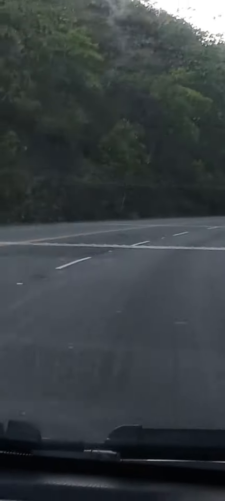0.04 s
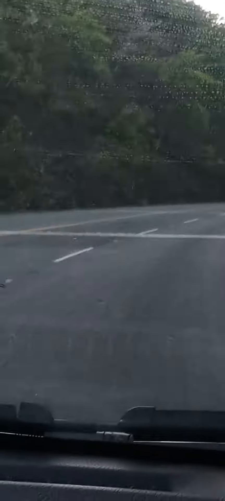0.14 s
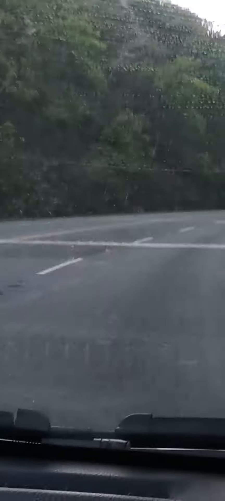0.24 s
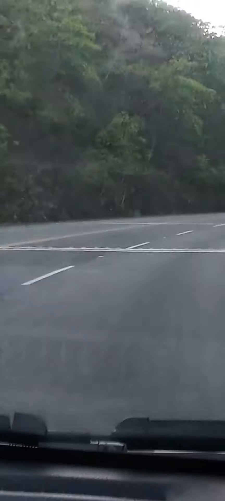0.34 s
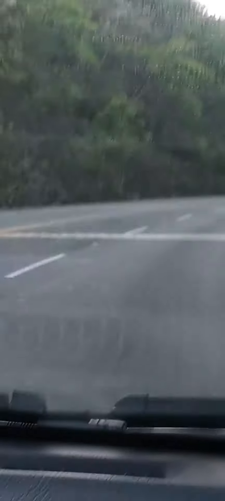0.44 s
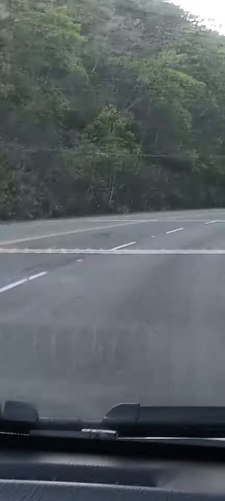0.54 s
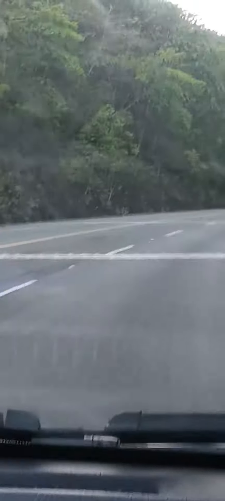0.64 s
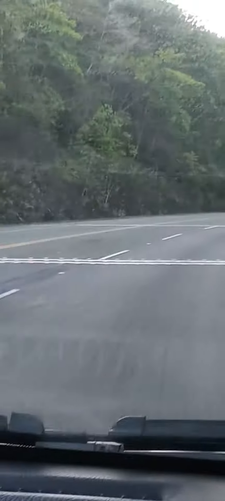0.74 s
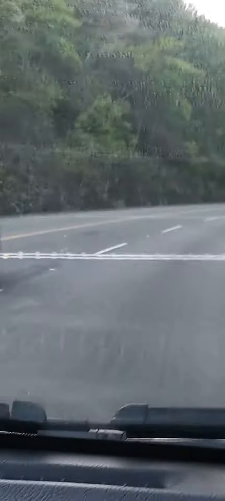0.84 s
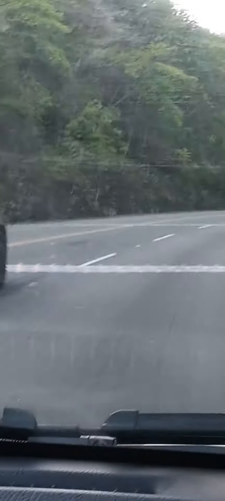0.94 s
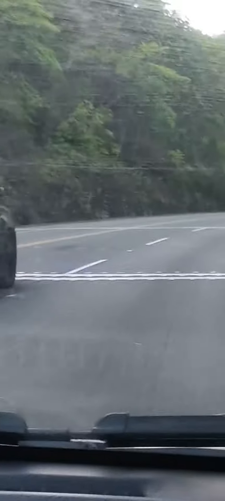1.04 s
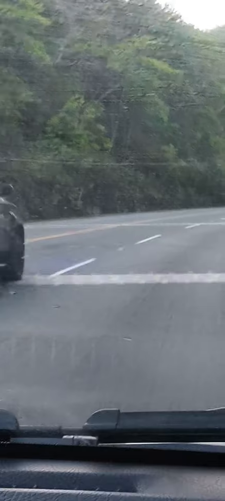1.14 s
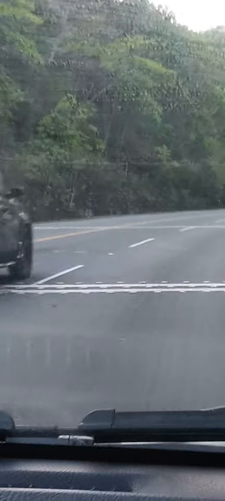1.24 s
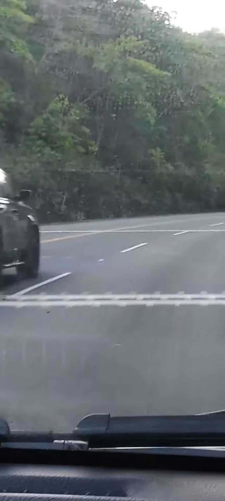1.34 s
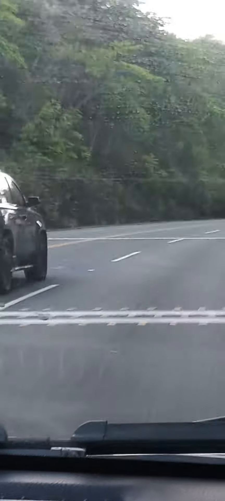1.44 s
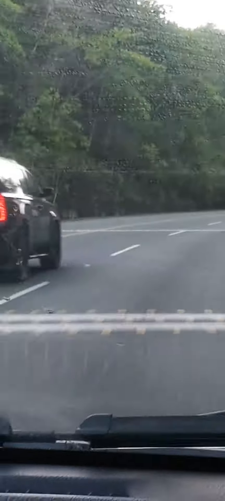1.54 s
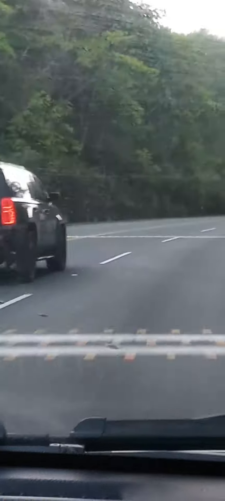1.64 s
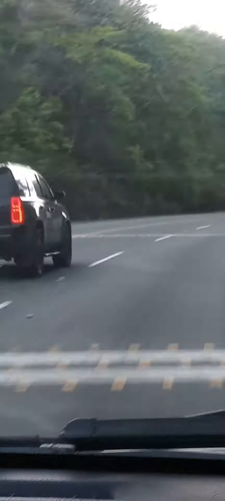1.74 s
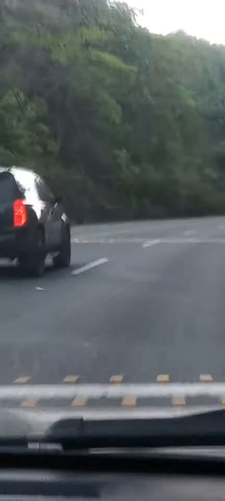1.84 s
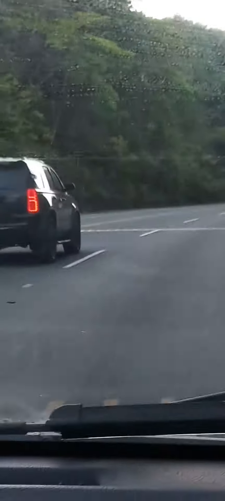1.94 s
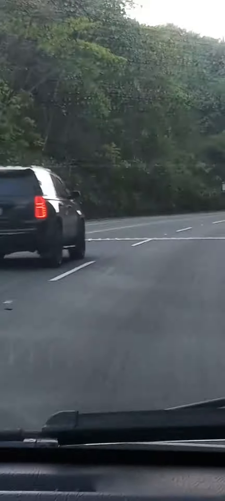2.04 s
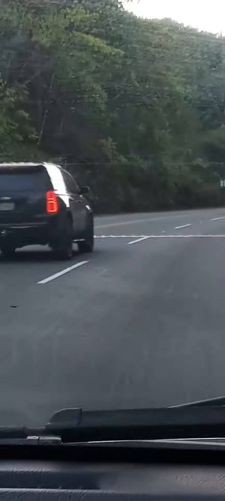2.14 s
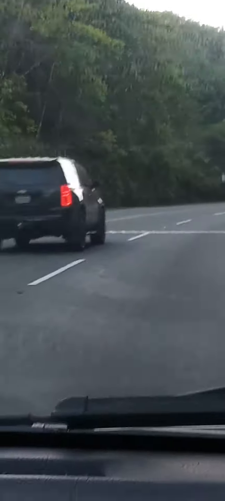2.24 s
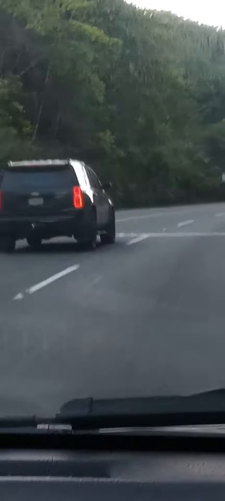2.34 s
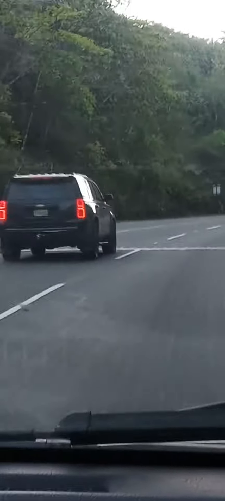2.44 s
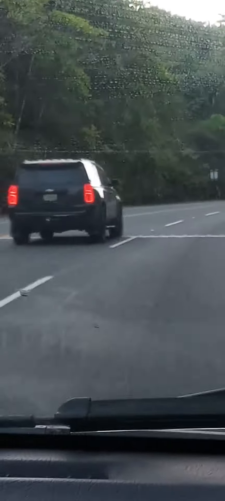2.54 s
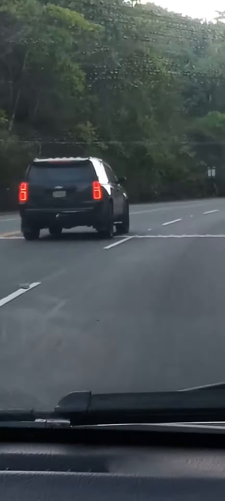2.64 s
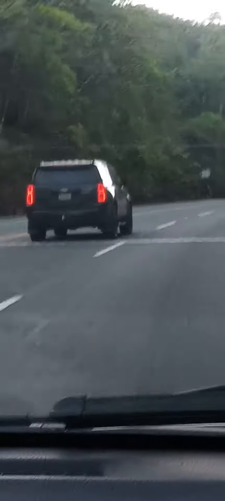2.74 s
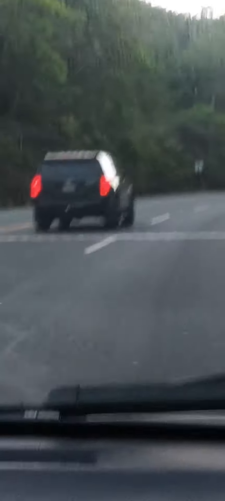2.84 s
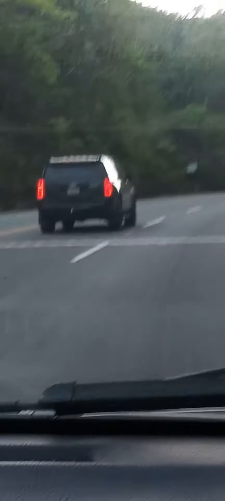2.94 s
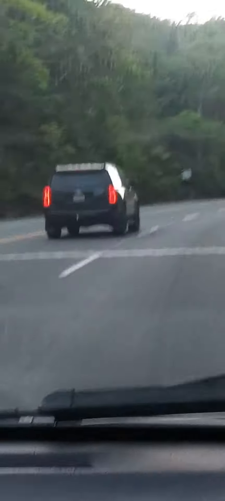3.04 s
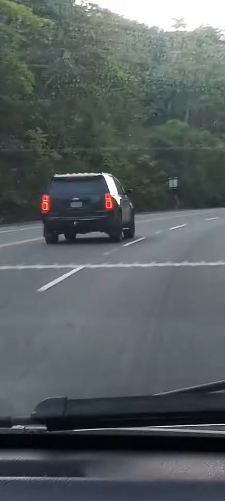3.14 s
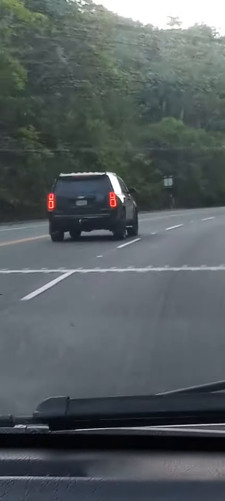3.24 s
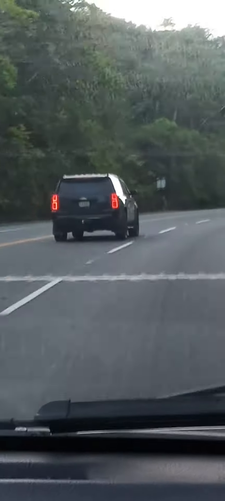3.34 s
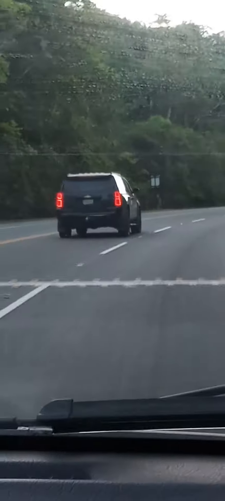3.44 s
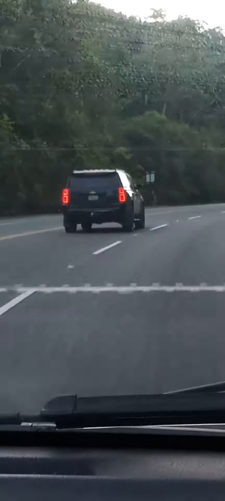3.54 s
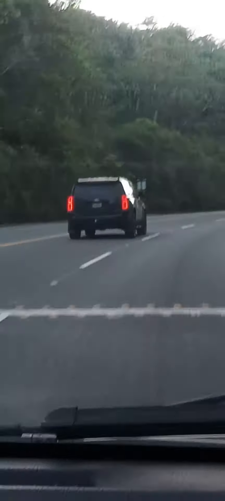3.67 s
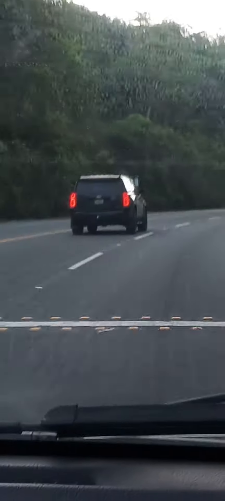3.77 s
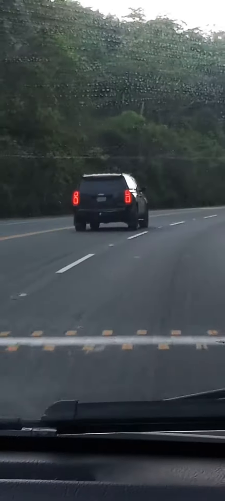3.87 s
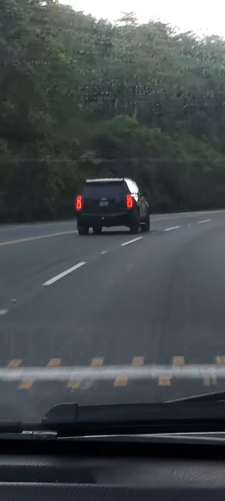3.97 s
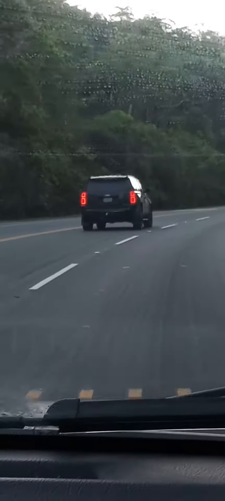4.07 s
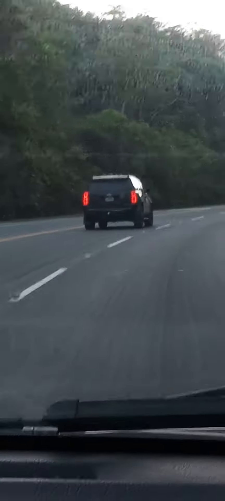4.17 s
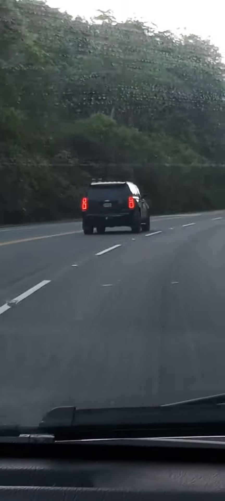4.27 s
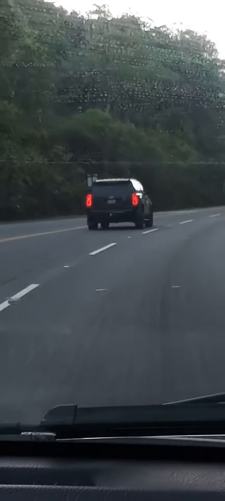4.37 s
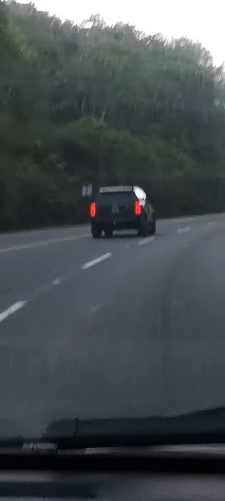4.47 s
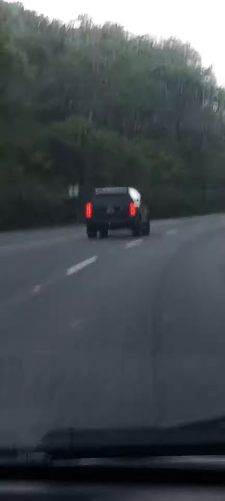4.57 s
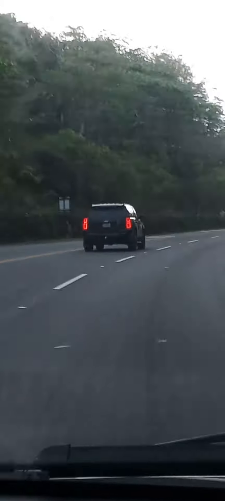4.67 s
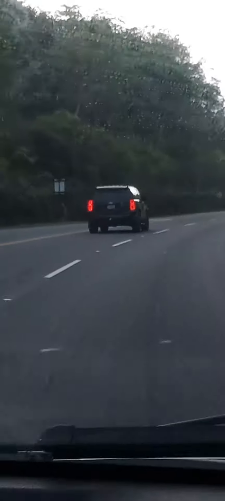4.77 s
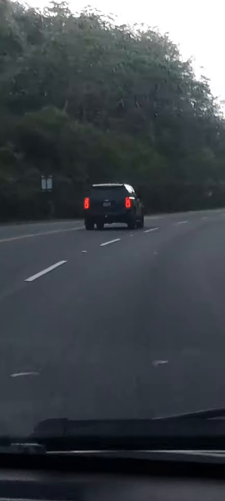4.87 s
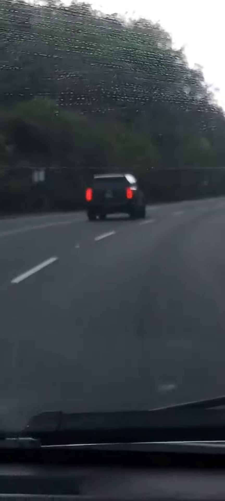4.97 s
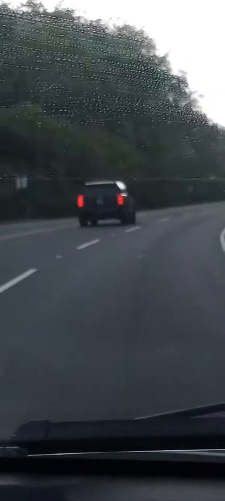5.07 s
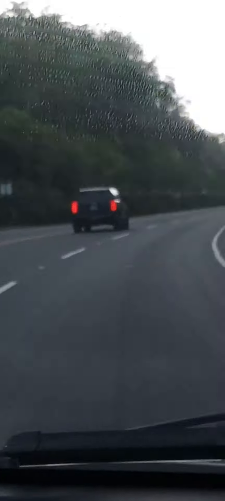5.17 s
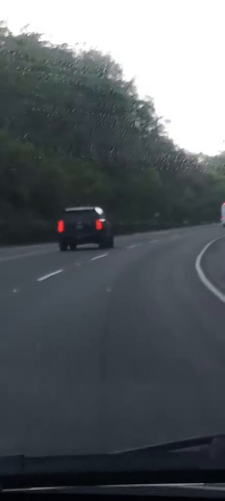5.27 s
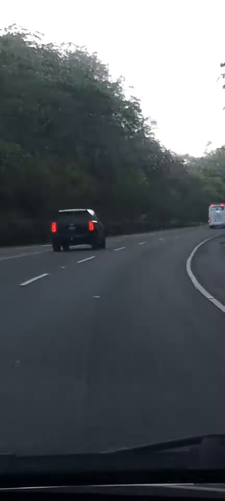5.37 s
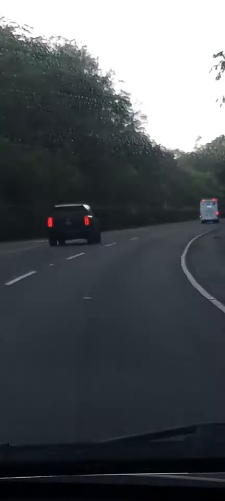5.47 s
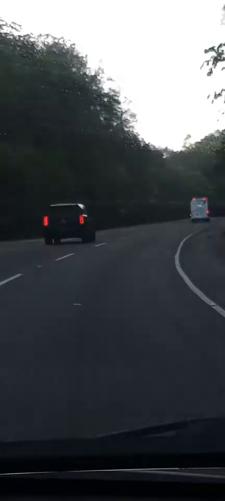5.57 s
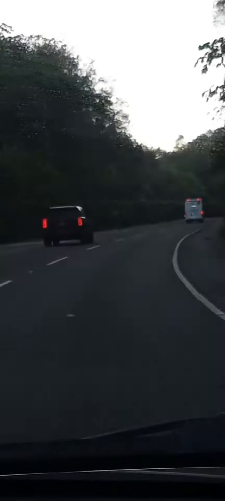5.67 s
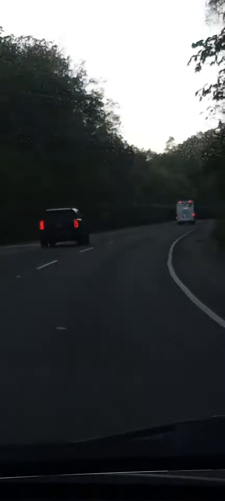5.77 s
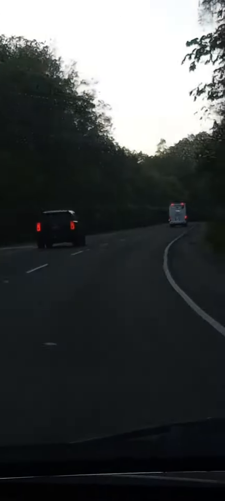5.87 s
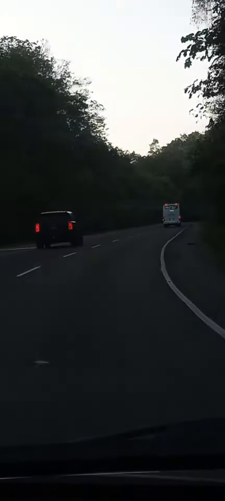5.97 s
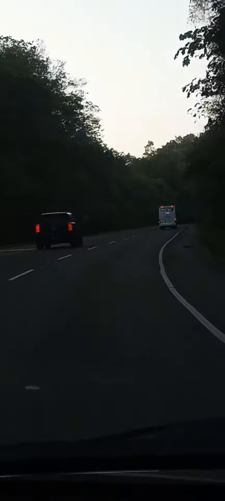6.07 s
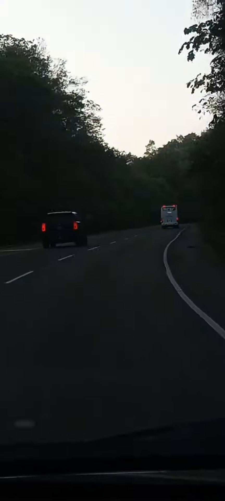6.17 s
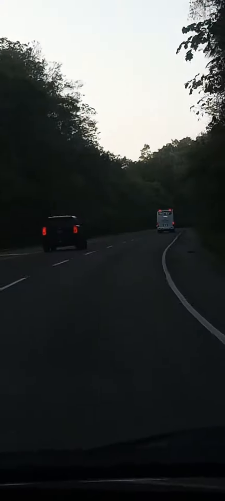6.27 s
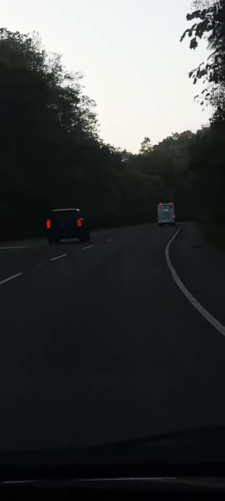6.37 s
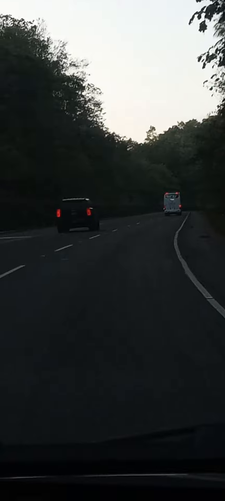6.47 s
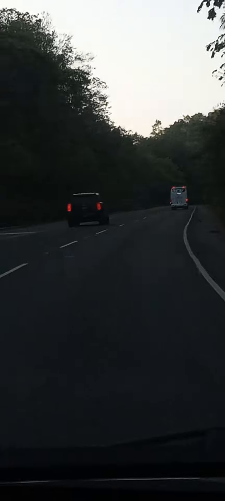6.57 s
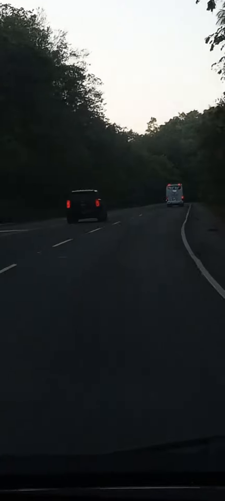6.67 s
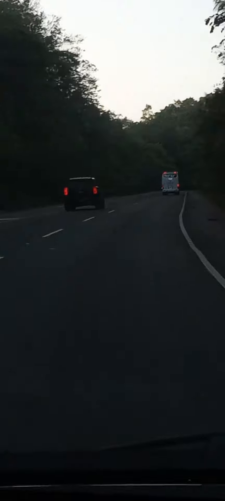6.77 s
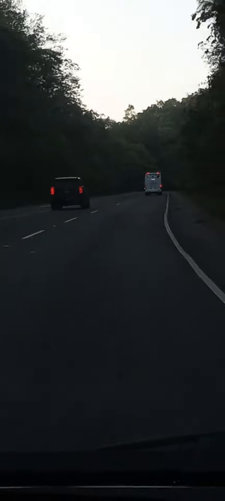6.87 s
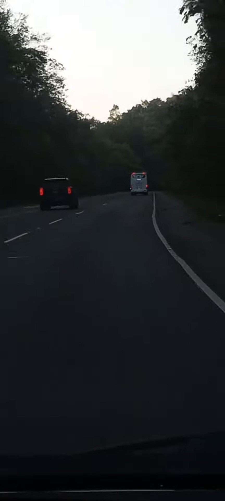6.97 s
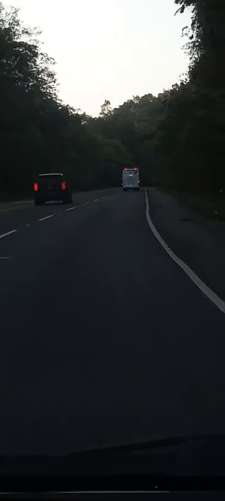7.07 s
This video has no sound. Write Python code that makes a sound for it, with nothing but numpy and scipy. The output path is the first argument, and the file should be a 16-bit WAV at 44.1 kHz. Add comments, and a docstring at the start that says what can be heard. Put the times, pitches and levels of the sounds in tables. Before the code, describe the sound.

Inside a car at highway speed, picked up by a microphone near the dashboard. Almost at once, from 0.07 to about 0.45 seconds, front then rear tyres cross a rumble strip: two joined bursts of very rapid rib blows, about forty a second, booming deep in the cabin, with buzzing trim, plastic clacks, dull suspension knocks and bright loose-metal jingling. A soft rebound and a few tiny ticks follow, over a low asphalt drone with small bumps near 1.1 and 1.5. At 2.24 to 2.6 the second double burst hits just as hard, ending in a low body bounce near 2.7. Quiet drone continues, with light bumps near 3.9 and 4.26. At 4.47 comes a very short burst, then a duller, heavier thump at 4.66 to 4.75. A rebound at 4.9 settles into steady muffled road hum, gentle bumps, soft rush and faint thin whine until 7.1.

```python
"""Rumble strips from inside a car

Three sets of raised ribs pass under the front, then the rear tyres of a car on a highway. Rib blows and noise
ring the body, cabin air and panels into a boom; shaped noise makes the trim buzz, rattle and knock.
A loose metal piece jingles as decaying sine modes, and small trim parts ring as clusters of close ones.
Behind them coloured noise gives asphalt drone with swells at bumps, rush and faint microphone hiss, with a
thin wavering whine. The recorder's gain control ducks a little in the loud passages."""
import sys
import numpy as np
from scipy import signal
from scipy.fft import rfft, irfft, next_fast_len
from scipy.io import wavfile
from scipy.ndimage import uniform_filter1d, map_coordinates

SR = 44100
rng = np.random.default_rng(int(sys.argv[2]) if len(sys.argv) > 2 else 0)


def digitize_waveform(pressure):
    """Quantize a signal to 16-bit integers and store it at the path in sys.argv[1].

    Rows of a 2-D input are taken as channels; values are limited to [-1, 1].
    """
    field = np.atleast_2d(pressure).T
    bounded = np.clip(field, -1, 1)
    quanta = np.round(bounded * 32767).astype(np.int16)
    wavfile.write(sys.argv[1], SR, quanta)


N = 313549

# Every "drive" is a level ahead of the fixed gains in the mix.
# Axle crossings, front then rear. Each row: first rib in seconds, last rib in seconds, ribs per second,
# trim lag in seconds, body heave drive in dB, cabin boom drive in dB, tread slap drive in dB, trim buzz drive in dB.
CROSSINGS = [(0.07, 0.297, 45, 0.018, -25, -16, -22.5, -35.5), (0.272, 0.45, 38.6, 0, -20, -13.5, -30, -37),
             (2.243, 2.43, 41.6, -0.0077, -26.5, -14, -22.5, -35),
             (2.455, 2.608, 49.6, 0.0063, -24, -13, -26, -29.5),
             (4.475, 4.517, 44, -0.012, -28, -11.5, -25.5, -35),
             (4.662, 4.743, 47.5, 0.0027, -18.5, -16.5, -33.5, -34)]
# How each part answers a crossing. Each holds: delay in seconds, rise in seconds, hang-on after the last rib
# in seconds, sag in dB per second, release in dB per second.
HEAVE_SHAPE = (0.064, 0.042, 0.059, 3.9, 140)
BOOM_SHAPE = (0.011, 0.013, 0.024, 11.7, 104)
SLAP_SHAPE = (0.0034, 0.019, 0.0069, 23, 260)
BUZZ_SHAPE = (0.0025, .013, 0.0048, 2.6, 197)
# Body jolts: a thump as the rear axle lands and a rebound after the strips.
# Each row: centre in seconds, bell spread in seconds, heave drive in dB, boom drive in dB.
JOLTS = [(.32, 0.01, -36, -7), (.635, .045, -31.5, -27), (2.495, 0.0096, -35, -12),
         (2.725, 0.035, -18, -34), (4.68, 0.055, -32, -14), (4.915, 0.031, -22.5, -22.5)]
# Resonances of the heaving body, the cabin air and the panels.
# Each row: frequency in Hz, width in Hz, relative level in dB.
BODY_MODES = [(31, 8.3, -13.5), (47.1, 3.9, 0)]
CABIN_MODES = [(76.6, 14, -3), (98.2, 15.8, 3), (133, 21.9, 1), (190, 44, -14)]
PANEL_MODES = [(272.4, 23, 4), (358.6, 39, 0.5), (435.5, 43, 2), (502, 37, -3), (593, 48, -2.5),
               (912, 39, -11), (1060, 180, -24)]
# Colours of the trim buzz and its bright chatter. Each row: frequency in Hz, relative level in dB.
BUZZ_COLOUR = [(500, -3), (900, 6.5), (1400, -2), (2000, 4), (2800, 1), (3600, -8), (5200, -9.5),
               (7100, -3.5), (8000, -21.5), (10500, -21), (13000, -45)]
CHATTER_COLOUR = [(7000, -4), (9000, -3), (10800, -8), (12500, -23), (14000, -11), (15300, -21), (15800, 5)]
# Stereo likeness of the shaken parts. Each row: frequency in Hz, left-right correlation.
SHAKE_ALIKE = [(150, 0.96), (350, 0.63), (700, 0.3), (1500, -0.093), (8000, 0.049)]
# Stereo balance of the shaken parts. Each row: frequency in Hz, left minus right in dB.
SHAKE_SIDE = [(100, 2), (300, -4.5), (600, -1), (1200, 0), (2500, 10.5), (4000, 0.5), (7000, 14.5),
              (8800, 1), (10000, -20), (12000, 2), (15000, 0)]

# The hardest strikes of the loose metal piece. Each row: start in seconds, strength in dB before panning.
JINGLES = [(0.0907, -15), (0.1057, -11.5), (0.1705, -19.5), (0.2109, -12.5), (0.2614, -16.5), (0.2887, -13),
           (0.3107, -12), (.4035, -22), (2.2488, -13.5), (2.2962, -14), (2.3231, -15), (2.3764, -13),
           (2.3984, -13.5), (2.4813, -18), (2.5346, -12), (2.583, -11), (4.4543, -22), (4.4712, -10.5),
           (4.6723, -24)]
# Modes of the metal piece. Each row: frequency in Hz, relative level in dB, 60 dB decay in seconds.
METAL_MODES = [(6410, 0.5, 0.13), (6120, 11.5, 0.015), (6430, -4, 0.022), (7200, -3, 0.031),
               (6847, 1, 0.023), (8800, -17.5, 0.029)]
# Loose trim knocking. Each row: start in seconds, snap drive in dB, bright chatter drive in dB.
CLACKS = [(0.037, -35.5, -67), (0.0985, -18, -35.5), (0.151, -23.5, -60), (0.288, -24.5, -32.5),
          (0.318, -21, -50), (0.381, -24, -54), (0.4342, -19.5, -53), (0.6876, -46, -73), (.962, -48, -61),
          (1.014, -42, -59), (1.118, -35.5, -55), (1.137, -54, -53), (1.224, -47, -58), (2.036, -39.5, -74),
          (2.2338, -24, -41), (2.441, -22, -45), (2.482, -24, -44), (2.5342, -18.5, -36), (2.572, -17, -46),
          (2.618, -23.5, -73), (4.4347, -30, -42), (4.456, -27, -47), (4.467, -21, -40), (4.651, -31, -63),
          (4.671, -22.5, -65.5), (4.7093, -22, -54), (4.7474, -30, -65), (4.8074, -38, -67),
          (5.4015, -40, -68.5)]
# Hard hollow knocks of the suspension. Each row: start in seconds, drive in dB.
KNOCKS = [(.03, -26.5), (.044, -18.5), (.123, -23), (.211, -20.5), (.25, -27), (.29, -21), (2.253, -21),
          (2.295, -21), (4.471, -19), (4.502, -22), (4.715, -25.5), (4.752, -29)]
# Colours of a plastic clack and a suspension knock. Each row: frequency in Hz, relative level in dB.
CLACK_COLOUR = [(300, -20), (900, 0), (2000, 1.5), (3000, 2.5), (3800, -4), (5300, -4), (7200, -2.5),
                (8200, -27), (11000, -21), (13000, -38), (15500, -27)]
KNOCK_COLOUR = [(180, -14), (330, 9), (600, 6.5), (750, -20), (1100, 0.5), (1600, -4.5), (3000, -40),
                (8000, -85)]
# Single trim parts ringing briefly. Each row: start in seconds, drive in dB, pitch in Hz.
PINGS = [(0.065, -33.5, 3260), (0.437, -30, 2840), (.485, -32, 2170), (0.558, -38, 2960),
         (.69, -40.5, 2960), (0.854, -37.5, 3170), (1.119, -39, 3140), (1.122, -36, 6750),
         (1.363, -38.5, 1320), (1.405, -47, 3250), (1.731, -48, 3120), (1.777, -43, 6150),
         (1.795, -41, 3130), (2.7, -34.5, 4730), (4.435, -32, 2890), (4.567, -32, 3070), (4.801, -34, 2970),
         (4.848, -37, 2560), (5.403, -46, 3070), (7.023, -48, 2980)]

# A thin high whine. Each row: time in seconds, pitch in Hz, drive in dB.
WHINE = [(0, 6100, -53), (1.0, 5990, -64.5), (2.05, 5850, -68), (3.3, 5705, -67), (3.902, 5840, -68.5),
         (5.6, 5850, -65), (6.6, 5810, -66), (7.11, 6140, -90)]
# Bumps in the asphalt. Each row: centre in seconds, bell spread in seconds, drone drive in dB, rumble drive in dB.
BUMPS = [(.795, 0.026, -28.5, -37), (1.088, 0.018, -19.5, -48), (1.22, 0.021, -28.5, -40),
         (1.505, 0.024, -29, -29), (1.67, .03, -29, -42), (1.83, 0.022, -54, -33), (3.908, 0.024, -29, -48),
         (4.26, 0.044, -26, -46), (5.07, 0.042, -24, -38), (5.29, 0.02, -26, -48),
         (6.13, 0.016, -29.5, -48), (6.31, 0.013, -30.5, -50), (6.55, 0.017, -22, -29.5),
         (6.85, 0.06, -34, -48)]
# Coarseness of the asphalt, which drives drone, rumble and rush. Each row: time in seconds, change in dB.
COARSENESS = [(0, -1.5), (1.8, -0.5), (2.9, -0.5), (4.0, -1.5), (5.3, 1.5), (5.8, -0.5), (7.11, 0.5)]
# Colours of the road drone, deep rumble and rush. Each row: frequency in Hz, relative level in dB.
DRONE_COLOUR = [(38, -48), (65, -12.5), (97, -2.5), (118, -7), (132, 4.5), (167, -10), (184, -10),
                (209, -16), (240, -42.5), (310, -46.5), (530, -120)]
RUMBLE_COLOUR = [(12, -41), (28, -25), (45, -8), (65, 4.5), (90, -43), (200, -80)]
RUSH_COLOUR = [(130, -9), (220, -5), (280, -3.5), (372, -11.5), (650, -17.5), (720, -23.5), (1050, -22.5),
               (1200, -29), (2440, -31), (3290, -41), (5400, -43.5), (7000, -40), (8000, -54.5),
               (10400, -64)]
# Colour of the microphone's own hiss. Each row: frequency in Hz, relative level in dB.
MIC_HISS_COLOUR = [(5000, -49), (8300, -2), (10200, 3.5), (12500, 3.5), (13900, -6), (14600, 12),
                   (15300, 11), (15800, 3)]
# Faint narrow whistles. Each row: frequency in Hz, width in Hz, relative level in dB.
WHISTLE_MODES = [(4370, 19, 0.5), (6510, 100, -12), (7266, 54, -4), (8770, 91, -15.5), (10130, 110, -13)]
# Stereo likeness of the background bed. Each row: frequency in Hz, left-right correlation.
BED_ALIKE = [(60, .96), (130, .93), (290, .58), (640, .45), (1410, .05), (3100, .1), (6820, -.1),
             (15000, .1)]
# Stereo balance of the background bed. Each row: frequency in Hz, left minus right in dB.
BED_SIDE = [(90, -4), (130, 2), (250, -3.5), (600, -2), (1400, 2), (2500, 7), (4000, 0), (5200, 3),
            (6800, 14.5), (8500, 0), (10000, -12), (14500, 0.5)]

CHATTER_DB = -23  # chatter drive relative to the buzz drive
# Loose parts tossed with the buzz: strikes per second, dB relative to the buzz drive, scatter in dB.
JINGLES_PER_S, JINGLE_DB, JINGLE_SCATTER_DB = 38, 10, 8.5
RATTLES_PER_S, RATTLE_DB, RATTLE_SCATTER_DB = 55, 5, 2
# Road drives at zero coarseness, in dB, and growth in dB per dB of coarseness.
DRONE_DB, RUMBLE_DB, RUSH_DB = -35, -46, -41
RUMBLE_GROWS, RUSH_GROWS = 2, 0.31
# The air ring inside the tyres: base mode and line width in Hz, level in dB, loss per overtone in dB.
CAVITY_HZ, CAVITY_WIDTH_HZ, CAVITY_DB, CAVITY_FALL_DB = 216.2, 9.7, -56, 3.5
# Gain control: threshold in dB, dB lost per dB above it, recovery of its level meter in dB per second.
AGC_DB, AGC_SLOPE, AGC_RECOVERY = -23.5, 0.25, 29.3
TOP_HZ = 15850  # band limit of the recorder


def strips(heave, boom, slap, buzz):
    """Rib blows and tread roughness ring the body, cabin air and panels, and make the trim buzz."""
    blows = rib_blows(scatter=0.00203, size_db=7.5)
    body = resonate(blows + 3.1 * noise()[0], BODY_MODES)
    body = steady(band(body[None], 22, 85), 0.48)
    air = shaken_image(noise() + np.outer([.9, 0], blows))
    air = steady(band(resonate(air, CABIN_MODES), 57.5, 212), 0.053)

    # every blow is followed by a short flurry of contacts
    t = np.arange(SR // 10) / SR
    after_blows = signal.fftconvolve(blows, amp(-60 * t / 0.36))[:N]
    flurry = np.sqrt(7.0 + unit(np.abs(after_blows)))
    tread = shaken_image(flurry * noise() + np.outer([.7, 0], blows))
    tread = patchy(tread, depth_db=4.0, width_hz=42.06, life=.08)
    tread = steady(band(resonate(tread, PANEL_MODES), 156, 1320, order=3), 0.029)

    # the buzz shifts in colour and strength from moment to moment
    contacts = patchy(flurry * noise(), depth_db=5, width_hz=90, life=.04)
    contacts *= amp(1.56 * wobble(600) + 1.2 * wobble(110))
    trim = steady(shaken_image(coloured(contacts, BUZZ_COLOUR)), 0.058)

    chatter = patchy(noise(), depth_db=7.5, width_hz=270, life=0.019) * amp(1.2 * wobble(220))
    chatter = steady(shaken_image(coloured(chatter, CHATTER_COLOUR)), 0.055)
    hits = [(s, db) for s, _, db in CLACKS]
    snaps = struck(hits, attack=0.0011, t60=0.11, tail_db=-5, tail_t60=0.095)
    sizzle = np.hypot(amp(CHATTER_DB) * buzz, snaps)

    low = amp(2.5) * heave * body + amp(0.63) * boom * air + amp(0.06) * slap * tread
    return low + amp(0.37) * buzz * trim + amp(7.5) * sizzle * chatter


def rib_blows(scatter, size_db):
    """One push each time a tyre meets a rib, a little uneven in time and size."""
    blows = np.zeros(N)
    for first, last, rate, *_ in CROSSINGS:
        slip, size = rng.standard_normal((2, 16))
        s = first + np.arange(16) / rate
        at = np.clip((s + scatter * slip) * SR, 0, N - 1).astype(int)
        blows += np.bincount(at, amp(size_db * size) * (s <= last), N)
    return unit(blows)


def shaking():
    """Drive curves of heave, boom, slap and buzz as the axles cross the strips and the body jolts."""
    *_, trim_lags, heave_db, boom_db, slap_db, buzz_db = np.transpose(CROSSINGS)
    heave, boom = shaken(heave_db, HEAVE_SHAPE), shaken(boom_db, BOOM_SHAPE)
    slap, buzz = shaken(slap_db, SLAP_SHAPE), shaken(buzz_db, BUZZ_SHAPE, trim_lags)
    bounce, thud = swells(JOLTS)
    return np.hypot(heave, bounce), np.hypot(boom, thud), slap, buzz


def shaken(levels_db, shape, lags=0):
    """One part's drive over all crossings: it rises, sags from the first rib on, then dies away."""
    delay, rise, hang, sag, release = shape
    t = np.arange(N) / SR
    power = np.zeros(N)
    firsts, lasts, *_ = np.transpose(CROSSINGS)
    for first, last, db in zip(firsts + lags, lasts, levels_db):
        early = np.maximum(0, first + delay - t)
        fall_db = sag * np.maximum(0, t - first) + release * np.maximum(0, t - last - hang)
        power += (amp(db - fall_db) * np.exp(-(early / rise) ** 2)) ** 2
    return np.sqrt(power)


def jingle(strikes, detune=0.0102, vary_db=4, attack=0.0013):
    """A loose metal piece on the left; each strike shares its energy among the modes in a new way."""
    t = np.arange(SR // 6) / SR
    hz, level, t60 = np.transpose(METAL_MODES)[:, :, None]
    out = np.zeros((2, N + SR))
    for s, db in strikes:
        size, pitch = rng.standard_normal((2, len(METAL_MODES), 1))
        share = amp(level + vary_db * size)
        share /= np.linalg.norm(share)
        # separate starting phases for left and right
        phase = 2 * np.pi * (hz * (1 + detune * pitch) * t + rng.random((2, len(METAL_MODES), 1)))
        ring = (share * amp(-60 * t / t60) * np.sin(phase)).sum(1)
        out[:, round(s * SR):][:, :len(t)] += amp(db) * ring * (1 - np.exp(-t / attack))
    return out[:, :N] * amp([[4], [-13]])


def rattle(strikes):
    """Short dry taps of loose trim while the ribs pass, as bursts of coloured noise."""
    ring = unit(shaken_image(coloured(noise(), CLACK_COLOUR)))
    return struck(strikes, attack=0.00065, t60=0.016, tail_db=-19, tail_t60=0.056) * ring


def tossed(buzz, per_s, level_db, scatter_db):
    """Unevenly spaced strikes of a loose part as (seconds, dB), their strength following the buzz drive."""
    slip, size = rng.standard_normal((1024, 2)).T
    s = (np.arange(len(slip)) + 0.33 * slip) / per_s
    buzz_at = np.interp(s, np.arange(N) / SR, buzz, left=0, right=0)
    buzz_db = 20 * np.log10(buzz_at + 1e-9)
    strike_db = buzz_db + level_db + scatter_db * np.tanh(size)
    loose = buzz_db > -41  # a weaker buzz tosses nothing
    return list(zip(s[loose], strike_db[loose]))


def clacks():
    """Plastic trim snaps against its seat; the suspension knocks lower and duller."""
    hits = [(s, db) for s, db, _ in CLACKS]
    snap = struck(hits, attack=0.0017, t60=0.024, tail_db=-6, tail_t60=0.15)
    knock = struck(KNOCKS, attack=0.0043, t60=0.089, tail_db=1.5, tail_t60=0.41)
    plastic = amp(-5.0) * snap * knock_noise(CLACK_COLOUR, depth_db=1.0)
    suspension = amp(-12) * knock * knock_noise(KNOCK_COLOUR, depth_db=3)
    return plastic + suspension


def knock_noise(colour, depth_db):
    """Patchy coloured noise in the stereo image of the shaken parts."""
    grain = patchy(noise(), depth_db, width_hz=130, life=.06)
    return unit(shaken_image(coloured(grain, colour)))


def pings(t60=0.12, cluster=0.04, attack=0.0017):
    """A small trim part rings with a cluster of close modes."""
    t = np.arange(SR // 4) / SR
    out = np.zeros((2, N + SR))
    for s, db, hz in PINGS:
        modes = hz * (1 + cluster * rng.laplace(size=(16, 1)))
        ring = np.sin(2 * np.pi * (modes * t + rng.random((2, 16, 1)))).mean(1)
        level = amp(db + 8.5 - 60 * t / t60) * (1 - np.exp(-t / attack))
        out[:, round(s * SR):][:, :len(t)] += level * ring
    return out[:, :N] * amp([[4], [-2]])


def whine(width_hz=80, flicker_db=5.0):
    """A thin, fuzzy high tone that flickers, mostly on the left: slow noise on a wandering carrier."""
    s, hz, db = np.transpose(WHINE)
    t = np.arange(N) / SR
    pitch = np.interp(t, s, hz) + 30 * wobble(7.1)
    phase = 2 * np.pi * np.cumsum(pitch) / SR
    a, b = filtered(noise(), lambda f: 1 / (1 + (f / width_hz) ** 2))
    tone = unit(a * np.cos(phase) + b * np.sin(phase))
    flicker = amp(flicker_db * np.tanh(2 * wobble(18)))
    return amp(np.interp(t, s, db)) * flicker * tone * amp([[2], [-7]])


def background():
    """The asphalt's drone, rumble and rush, tyre air ring, whistles, and the microphone's own faint hiss."""
    coarse_db = np.interp(np.arange(N) / SR, *np.transpose(COARSENESS))
    return drone_and_rumble(coarse_db) + rush(coarse_db) + tyre_cavity() + whistles() + microphone_hiss()


def drone_and_rumble(coarse_db):
    """Asphalt drones and rumbles through the cabin as low noise, swelling at bumps."""
    bump_drone, bump_rumble = swells(BUMPS)
    drone = np.hypot(amp(DRONE_DB + coarse_db + 0.66 * wobble(13)), bump_drone)
    rumble_db = RUMBLE_DB + RUMBLE_GROWS * coarse_db + 2.4 * np.tanh(wobble(6))
    rumble = np.hypot(amp(rumble_db), bump_rumble)
    drone_noise = steady(bed_image(coloured(noise(), DRONE_COLOUR)), 0.14)
    rumble_noise = steady(bed_image(coloured(noise(), RUMBLE_COLOUR)), .2)
    return amp(1.0) * drone * drone_noise + amp(-1.0) * rumble * rumble_noise


def rush(coarse_db):
    """Tyres and air rush outside: wide patchy noise that follows the coarseness."""
    grain = patchy(noise(), depth_db=3.0, width_hz=70, life=.07)
    return amp(RUSH_DB + RUSH_GROWS * coarse_db) * bed_image(coloured(grain, RUSH_COLOUR))


def tyre_cavity():
    """The air ring inside the tyres resonates at multiples 2 to 7 of its base mode."""
    overtones = [(k * CAVITY_HZ, CAVITY_WIDTH_HZ, -CAVITY_FALL_DB * k) for k in range(2, 8)]
    return amp(CAVITY_DB) * bed_image(band(resonate(noise(), overtones), 300, 1800))


def whistles():
    """Faint narrow whistles: patchy noise ringing high resonances."""
    grain = patchy(noise(), depth_db=6, width_hz=300, life=0.042)
    return amp(-69.0) * bed_image(band(resonate(grain, WHISTLE_MODES), 3200, 11200))


def microphone_hiss():
    """The microphone's own faint hiss: steady noise, strongest at the very top."""
    return amp(-72.0) * bed_image(coloured(noise(), MIC_HISS_COLOUR))


def bed_image(x):
    """Place two noises in the background's stereo image at unit level."""
    return unit(spread(x, BED_ALIKE, BED_SIDE))


def shaken_image(pair):
    """Place two signals in the stereo image of the shaken parts."""
    return spread(pair, SHAKE_ALIKE, SHAKE_SIDE)


def struck(events, attack, t60, tail_db, tail_t60):
    """Level of a row of hits: a quick rise, a decay and a longer or softer tail from the cabin."""
    t = np.arange(SR // 3) / SR
    decay = amp(-60 * t / t60) + amp(tail_db - 60 * t / tail_t60)
    shape = (1 - np.exp(-t / attack)) * decay
    level = np.zeros(N + SR)
    for s, db in events:
        level[round(s * SR):][:len(t)] += amp(db) * shape
    return level[:N]


def swells(rows):
    """Bell-shaped swells (seconds, spread in seconds, dB, ..): one gain curve for each dB column."""
    t = np.arange(N) / SR
    return sum(np.outer(amp(db), np.exp(-((t - s) / half) ** 2 / 2)) for s, half, *db in rows)


def patchy(x, depth_db, width_hz, life):
    """Narrow patches of the spectrum swell and fade, each lasting about life seconds."""
    hz, t, z = signal.stft(x, SR, nperseg=1024)
    grid = np.meshgrid(hz / width_hz, t / life, indexing="ij")
    field = map_coordinates(rng.standard_normal((300, 400)), grid, order=2, mode="wrap")
    return signal.istft(z * amp(depth_db * field), SR, nperseg=1024)[1][:, :N]


def steady(x, span):
    """Even out swells slower than span seconds, leaving rms near 1."""
    window = np.hanning(int(span * SR))
    power = signal.fftconvolve(x.mean(0) ** 2, window / window.sum(), "same")
    return x / np.sqrt(np.abs(power) + 1e-4 * power.mean())


def spread(pair, alike, side):
    """Two unrelated signals become left and right with the given likeness and balance."""
    size = next_fast_len(N + SR // 10)
    hz = np.fft.rfftfreq(size, 1 / SR)
    centre, width = rfft(pair, size)
    width *= np.tan(np.arccos(np.clip(along(alike, hz), -.99, .99)) / 2)
    lean = amp(np.outer([.5, -.5], along(side, hz)))
    lean /= np.sqrt(np.mean(lean ** 2, 0))
    return irfft(np.array([centre + width, centre - width]) * lean, size)[:, :N]


def resonate(x, modes):
    """x rings a set of (Hz, width, dB) resonances, alternating in sign."""
    def response(f):
        total = 0
        for k, (c, w, db) in enumerate(modes):
            total = total + (-1) ** k * amp(db) * 1j * f * w / (c * c - f * f + 1j * f * w)
        return total
    return filtered(x, response)


def coloured(x, spectrum):
    """x shaped by (Hz, dB) points."""
    return filtered(x, lambda hz: amp(along(spectrum, hz)))


def band(x, low_hz, high_hz, order=4):
    """Causal band-pass."""
    sos = signal.butter(order, [low_hz, high_hz], "band", fs=SR, output="sos")
    return signal.sosfilt(sos, x)


def filtered(x, response):
    """x times a response of frequency."""
    m = next_fast_len(N + SR // 4)
    return irfft(rfft(x, m) * response(np.fft.rfftfreq(m, 1 / SR)), m)[..., :N]


def noise():
    """Two unrelated white noises."""
    return rng.standard_normal((2, N))


def wobble(rate):
    """A smooth random curve, rate knots a second."""
    return map_coordinates(rng.standard_normal(4096), [np.arange(N) * rate / SR], order=2, mode="wrap")


def along(points, hz):
    """(Hz, value) points read on a log axis."""
    f, v = np.transpose(points)
    return np.interp(np.log(hz + 1), np.log(f + 1), v)


def unit(x):
    """Scale so that the centre of the stereo image has rms 1."""
    return x / np.sqrt(np.mean(np.atleast_2d(x).mean(0) ** 2) + 1e-20)


def amp(db):
    """Decibels to gain."""
    return 10 ** (np.asarray(db) / 20)


def scene():
    """Everything heard from the front seat, with the microphone's hiss."""
    heave, boom, slap, buzz = shaking()
    metal = jingle(JINGLES + tossed(buzz, JINGLES_PER_S, JINGLE_DB, JINGLE_SCATTER_DB))
    taps = rattle(tossed(buzz, RATTLES_PER_S, RATTLE_DB, RATTLE_SCATTER_DB))
    return strips(heave, boom, slap, buzz) + metal + taps + clacks() + pings() + whine() + background()


def record(dry):
    """The recorder turns its gain down in loud passages, recovers slowly, and cuts all above its band limit."""
    power = uniform_filter1d(np.mean(dry ** 2, 0), SR // 25)
    level_db = 10 * np.log10(np.abs(power) + 1e-12)
    # the meter jumps up with the level and falls back at a fixed rate
    ramp = AGC_RECOVERY * np.arange(N) / SR
    held_db = np.maximum.accumulate(level_db + ramp) - ramp
    gain = amp(-AGC_SLOPE * np.maximum(0, held_db - AGC_DB))
    return filtered(dry * gain, lambda hz: hz < TOP_HZ)


dry = scene()
out = record(dry)
digitize_waveform(out)
```